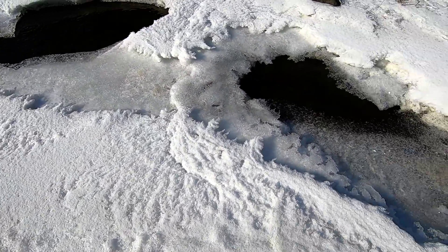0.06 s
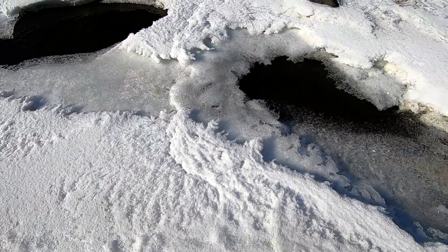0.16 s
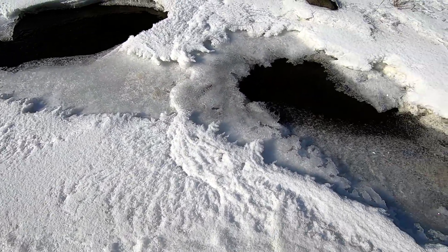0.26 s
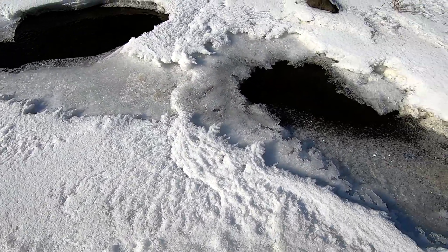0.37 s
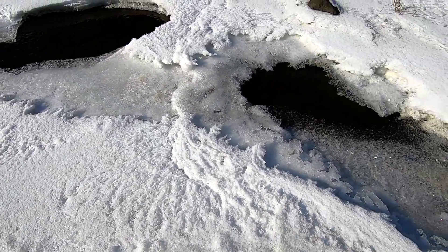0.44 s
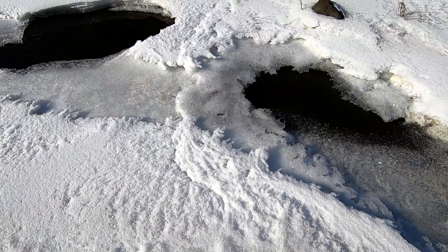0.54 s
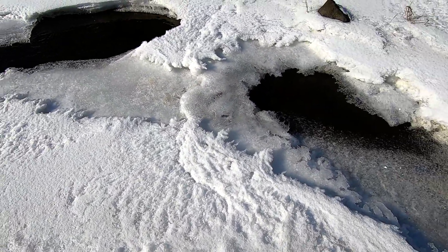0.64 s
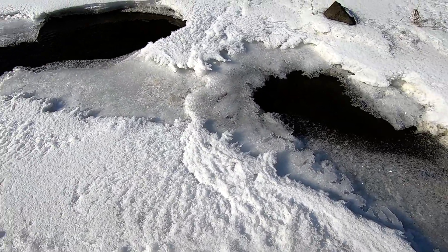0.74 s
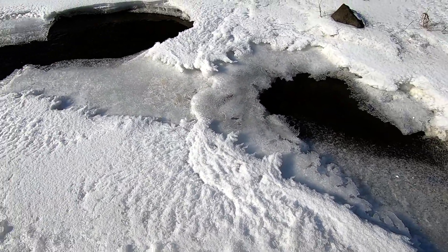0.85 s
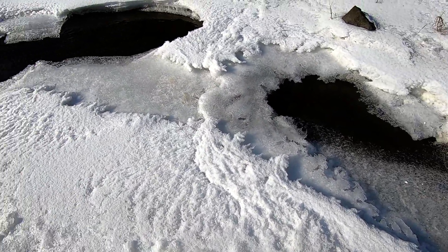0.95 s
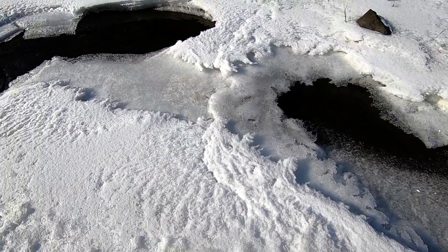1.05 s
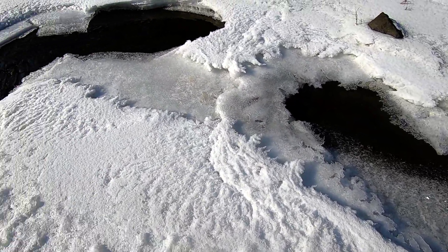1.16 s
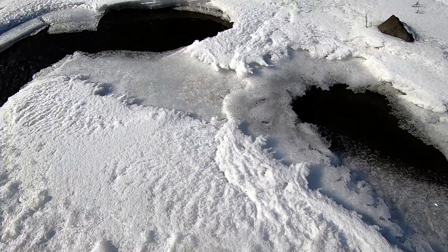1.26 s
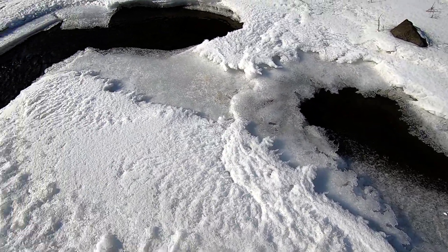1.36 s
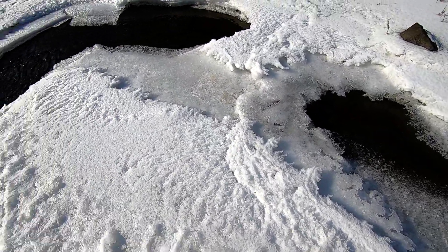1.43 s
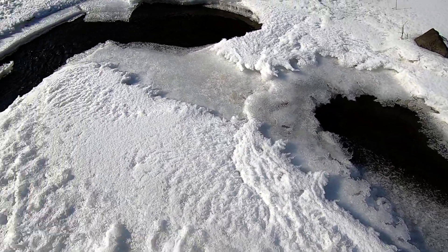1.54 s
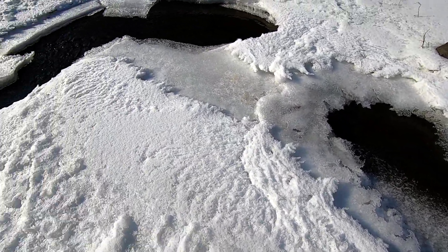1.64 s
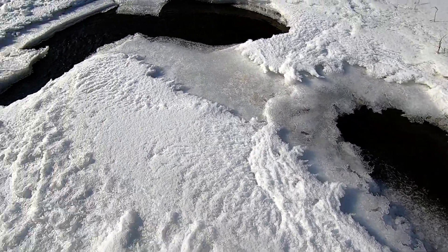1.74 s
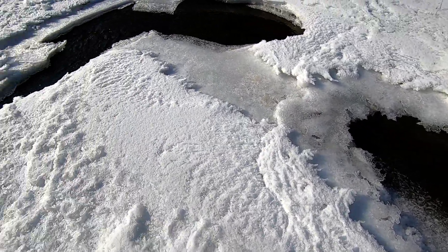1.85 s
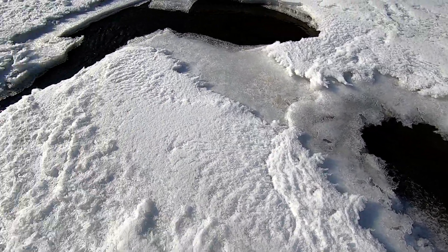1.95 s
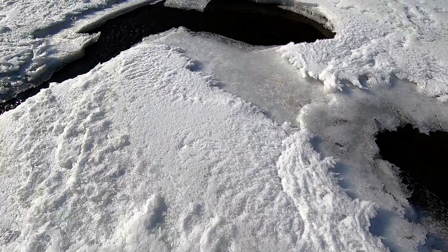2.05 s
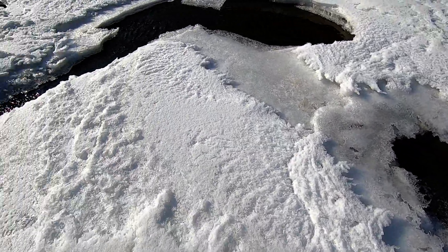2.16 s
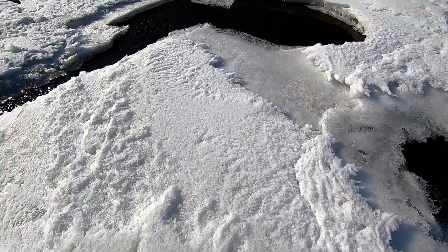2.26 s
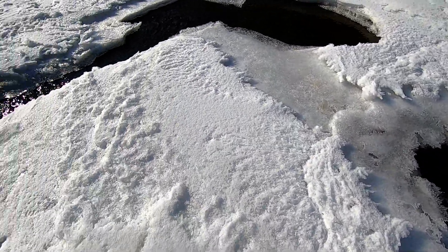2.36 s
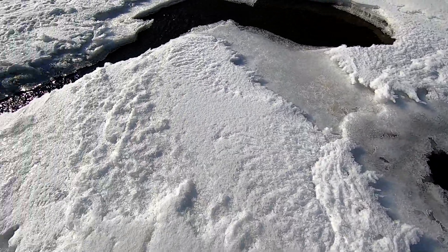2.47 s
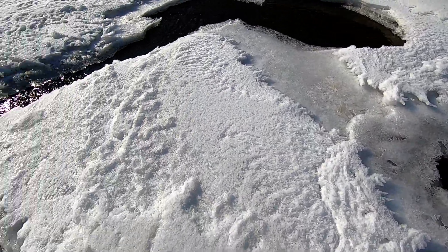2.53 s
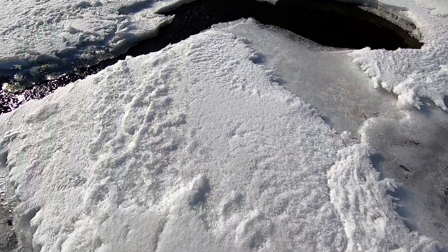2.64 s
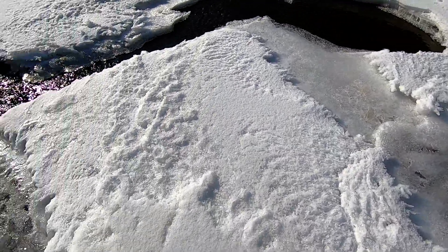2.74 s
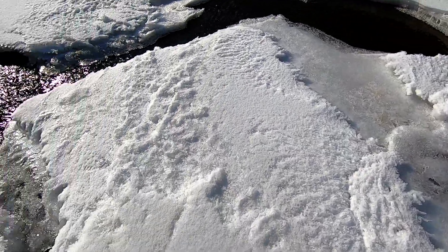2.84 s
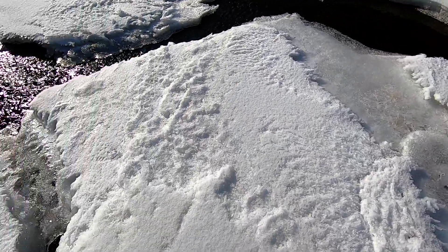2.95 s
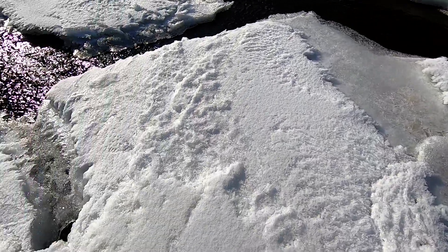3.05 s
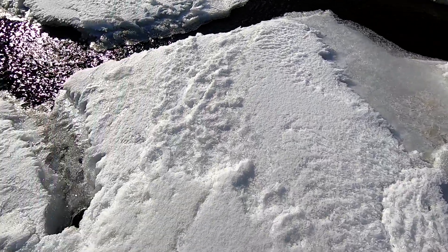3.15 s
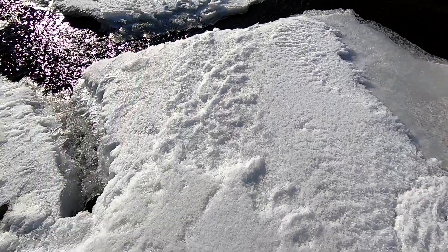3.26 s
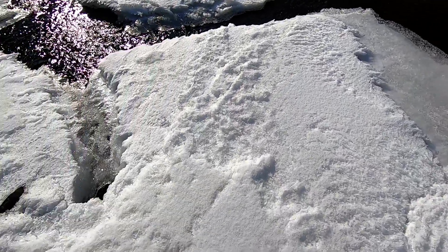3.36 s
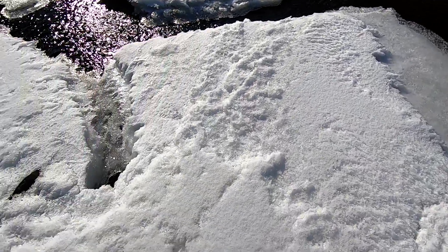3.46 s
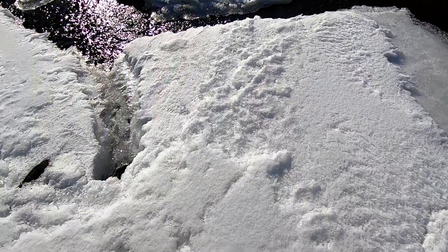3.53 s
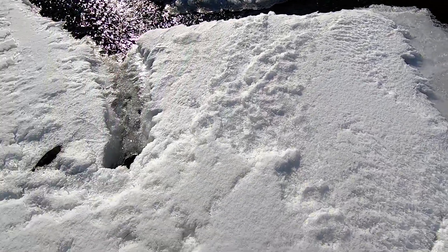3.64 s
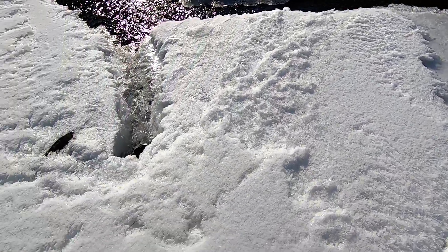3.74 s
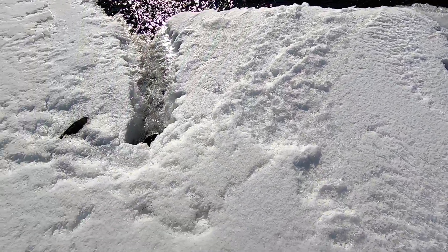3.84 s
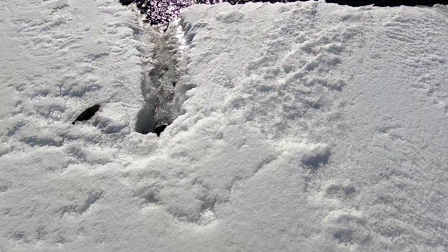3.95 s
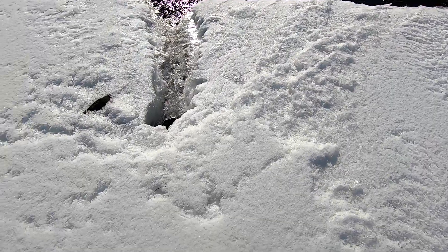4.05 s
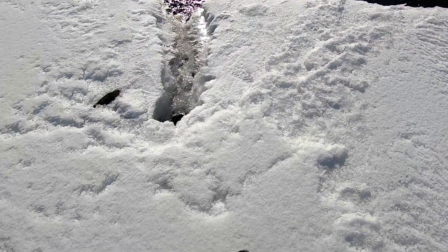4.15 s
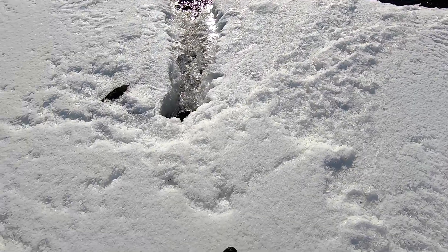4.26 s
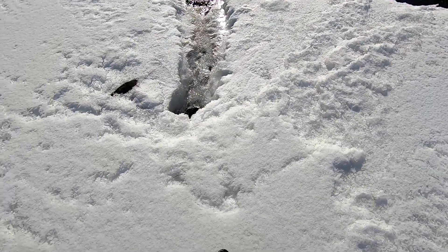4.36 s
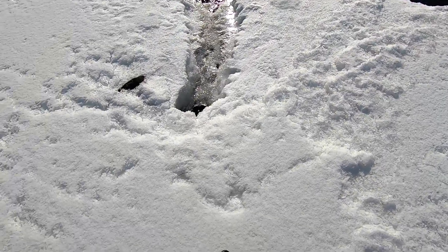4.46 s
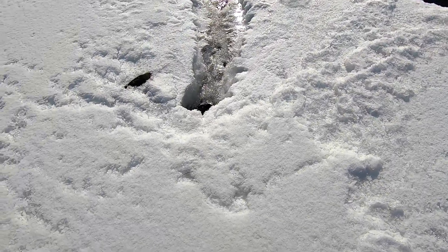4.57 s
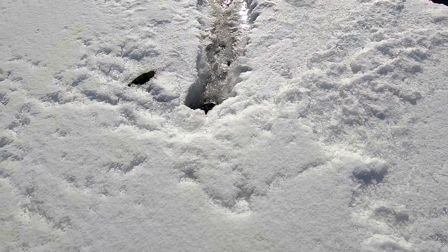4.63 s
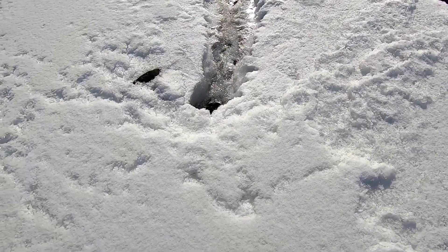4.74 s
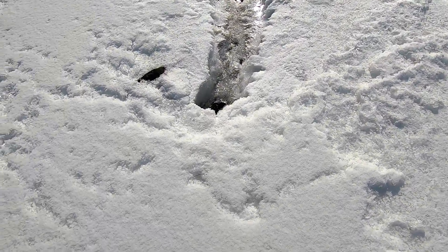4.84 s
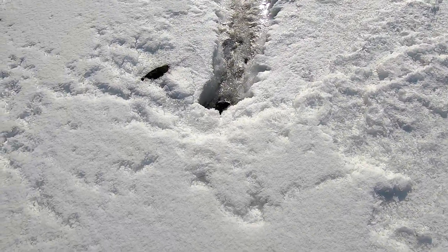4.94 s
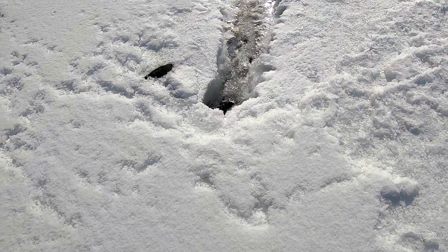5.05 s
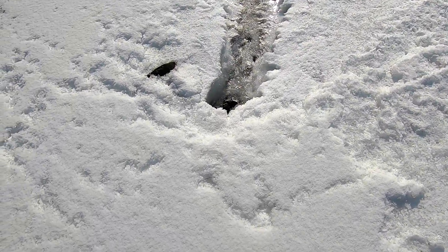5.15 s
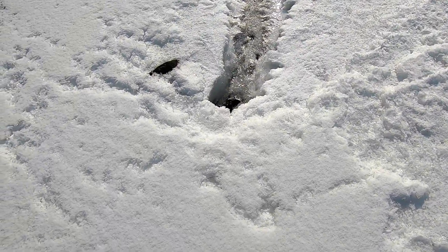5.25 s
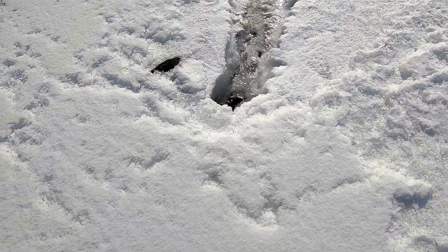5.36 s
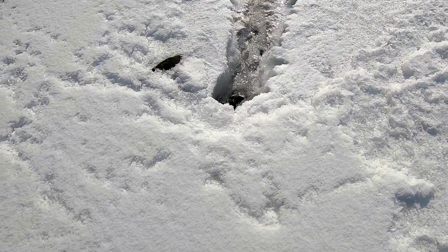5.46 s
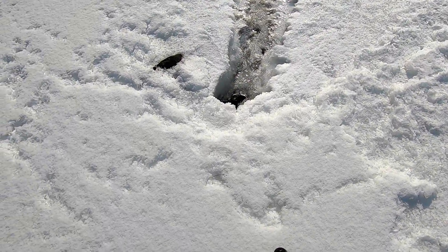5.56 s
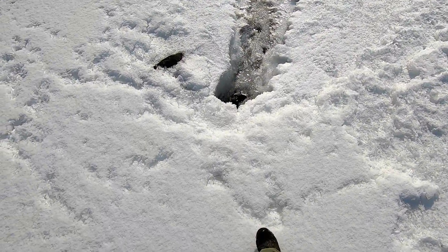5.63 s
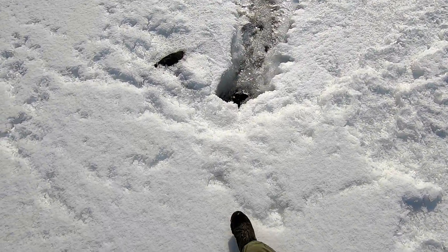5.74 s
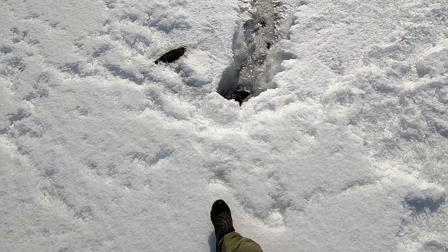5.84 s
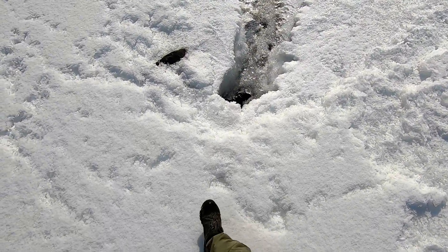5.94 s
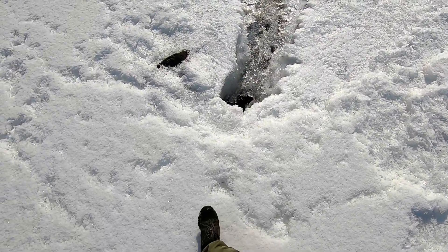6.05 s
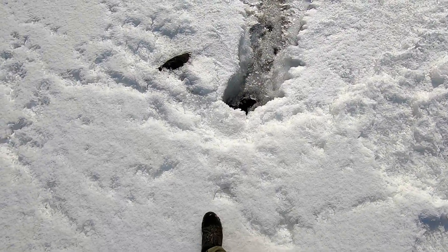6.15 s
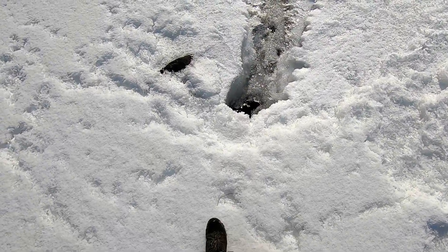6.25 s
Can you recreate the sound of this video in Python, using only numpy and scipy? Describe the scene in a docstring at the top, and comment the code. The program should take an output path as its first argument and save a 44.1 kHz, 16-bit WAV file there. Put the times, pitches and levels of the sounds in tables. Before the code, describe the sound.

A soft, even rush of river water runs throughout, mostly low and midrange, slightly patchy, with a very thin spray and countless tiny bubbles trickling beneath. A faint crust crack ticks at 0.6 s, and small clear bubble plinks stand out at about 0.7, 2.8 and 3.3 s. Around 3 to 4 s the water sounds more hollow and turns away from the left side; very weak low thuds hint at shifting weight. From 4 s boots press into brittle snow: crackling clusters at 4.2-4.5 s, denser crunches at 4.6-4.9 s, sharp breaks at 5.05 and 5.4 s, a brief easing, then heavy crunches at 5.8 and 6.2 s with the strongest low, gliding thumps. Loose grains crumble between cracks. The place is open and dry; the handheld microphone is close, steps brighter on the right and muffled left. It ends abruptly during the last step at about 6.3 s.

```python
"""On a frozen river, water rushes softly through gaps in the ice and someone takes a few quick steps.
The snow crust breaks under the boots: runs of tiny random fractures ring the plate that breaks off,
loose grains crumble between them, and each drop of weight sends a low gliding thud through the crust.
The river is noise shaped in drifting patches, with a thin spray and small ringing bubbles on top.
A hand-held camera listens through two ports; its body shadows the left one."""
import sys
import numpy as np
from scipy import signal
from scipy.fft import rfft, irfft
from scipy.io import wavfile
from scipy.ndimage import uniform_filter1d

SR = 44100
rng = np.random.default_rng(int(sys.argv[2]) if len(sys.argv) > 2 else 0)


def master(y):
    """Save y as 16-bit WAV."""
    cut = np.clip(np.atleast_2d(y).T, -1, 1)
    pcm = np.round(cut * 32767)  # scale
    wavfile.write(sys.argv[1], SR, pcm.astype(np.int16))


N = 277830

# clear cracks of the crust: start_s, level_db, length_s, plate_ring_hz, deep_knock_db (against the crack)
CRUST_CRACKS = [(.081, -40, 0.00052, 1050, -49), (.608, -26.5, 0.0031, 1740, -9.5),
                (4.054, -24.5, 0.004, 1800, -15), (4.09, -38, 0.0065, 1930, -20),
                (4.234, -29, 0.0027, 2010, -26), (4.2502, -25.5, 0.0011, 2020, -32),
                (4.262, -22.5, 0.0054, 1870, -8.5), (4.3365, -21.5, 0.0024, 1860, -30),
                (4.3535, -18.5, 0.0066, 2060, -23.5), (4.403, -31, 0.0012, 980, -20),
                (4.457, -29.5, 0.0022, 1970, -23), (4.491, -35, 0.0023, 1080, -4),
                (4.559, -31, .011, 970, -3.5), (4.6408, -30.5, 0.0013, 1140, -7.5),
                (4.648, -28.5, 0.0065, 1150, -12), (4.68, -31, 0.0077, 1080, -5.5),
                (4.6976, -30, 0.005, 1080, -15), (4.7362, -18.5, 0.0034, 1076, -4.5),
                (4.752, -29.5, 0.0068, 1780, -22), (4.7882, -30.5, 0.0025, 1010, -22),
                (4.8075, -23.5, 0.0023, 1000, -8.5), (4.821, -16.5, 0.013, 1090, -11),
                (4.8578, -19.5, 0.0041, 1354, -15), (4.863, -22.5, 0.011, 2140, -12),
                (4.93, -25.5, 0.008, 1870, -7.5), (4.984, -34, 0.014, 1960, -21),
                (5.0555, -15, 0.0016, 1760, -19.5), (5.058, -21.5, 0.015, 2090, -11),
                (5.108, -30.5, 0.0032, 1273, -21), (5.157, -30.5, 0.0052, 1790, -2.5),
                (5.1786, -22.5, 0.0092, 2140, -12), (5.2485, -33.5, 0.0058, 980, -13),
                (5.279, -34.5, 0.01, 1960, -6.5), (5.4084, -16, 0.0083, 1716, -13),
                (5.673, -29.5, 0.0021, 1830, -14), (5.7735, -34.5, 0.0032, 1800, -11),
                (5.7965, -26.5, 0.0066, 1700, -14), (5.812, -15, 0.016, 1140, -10.5),
                (5.85, -29.5, .0036, 2160, -12), (5.8965, -20.5, 0.0078, 1700, -8.5),
                (6.097, -25, .012, 1450, -12), (6.2223, -15, 0.0083, 3240, -12),
                (6.255, -23, 0.014, 1443, -7.5)]
# tone of the breaking crust: frequency_hz, density_db
CRUST_TONE = [(100, -34.5), (250, -16.5), (480, -1.5), (780, -5), (1050, 5.5), (1350, 1), (1600, 4.5),
              (2000, 5.5), (2800, -4), (3300, 0.5), (4000, -14.5), (6000, -19), (10000, -27.5),
              (12000, -48.5)]
# tone of the fine grit: frequency_hz, density_db
GRIT_TONE = [(2500, -19), (4000, -8), (4900, 9.5), (7200, -1), (9200, 7), (10200, -1), (11600, -20),
             (14500, -15), (16000, -40.5)]
# tone of the low knock of a deep break: frequency_hz, density_db
DEEP_TONE = [(100, -23), (300, -7), (480, -1.5), (700, -0.5), (1100, -30.5), (4000, -60)]


def crunch(crumble_grit_db=-11, crumble_deep_db=-11):
    """Clear cracks and small chips break over the fine crumbling of loose snow."""
    clicks = body, grit, deep = impulse(CRUST_TONE), impulse(GRIT_TONE), impulse(DEEP_TONE)
    coarse = fractures(N, 800, 4.3)
    fine = fractures(N, 1700, 7.6)
    loose = evened(through(coarse, body))
    loose += amp(crumble_deep_db) * evened(through(coarse, deep))
    loose += amp(crumble_grit_db) * evened(through(coarse + fine, grit))
    crumbling = scatter(pressure() * loose)
    cracking = np.zeros((2, N))
    for start_s, *shape in list(CRUST_CRACKS) + chips():
        for port, sound in zip(cracking, scatter(crack(*shape, clicks))):
            add(port, start_s, sound)
    return cracking + crumbling


# longer cracks are grittier, louder ones less so; GRIT_DB holds for the usual crack
GRIT_DB, GRIT_DB_PER_DOUBLING, GRIT_DB_PER_LEVEL_DB = -16.5, 2.2, -0.1738
USUAL_CRACK_DB, USUAL_CRACK_S = -25, .004


def crack(level_db, length_s, plate_hz, deep_db, clicks, snap=5, brittle_s=0.0058, onset_db=-11,
          ring_db=-3, ring_t60_s=0.018, settle_db=-20, settle_s=0.01):
    """A run of small fractures shakes the crust and rings the plate that breaks off."""
    body, grit, deep = clicks
    t = np.arange(3000) / SR
    length_s = np.clip(length_s, .0005, .03)
    grit_db = GRIT_DB + GRIT_DB_PER_DOUBLING * np.log2(length_s / USUAL_CRACK_S)
    grit_db += GRIT_DB_PER_LEVEL_DB * (level_db - USUAL_CRACK_DB)

    # the run holds for its length, drops steeply, and leaves a weak settling tail
    run = 1 / np.sqrt(1 + (t / length_s) ** 10)
    run += amp(settle_db) * np.exp(-t / settle_s)
    drive = run * evened(fractures(len(t), 7000, 3.3))
    # short cracks start with a snap; long ones start as grit and gather weight
    drive[:4] += snap * np.exp(-(length_s / brittle_s) ** 2) * np.array([.5, 1, 1, .5])
    held_back = np.tanh(length_s / brittle_s / 2) * np.maximum(1 - 2 * t / length_s, 0)
    push = drive * amp(onset_db * held_back)

    plate = amp(-60 * t / ring_t60_s) * np.cos(2 * np.pi * plate_hz * t) * np.tanh(t * plate_hz)
    ring = through(push, plate)
    sound = evened(evened(through(push, body)) + amp(ring_db) * evened(ring))
    sound += amp(grit_db) * evened(through(drive, grit))
    sound += amp(deep_db) * evened(through(push, deep))
    # the level counts the energy of crust and plate as if packed into 10 ms
    return amp(level_db) * sound * np.sqrt(.01 / t[-1])


def fractures(count, per_s, spread_db):
    """Tiny breaks fall at random samples with random sign, a few much larger than the rest."""
    size = amp(spread_db * np.minimum(rng.exponential(1, count), 4))
    return size * rng.choice([-1, 1], count) * (rng.random(count) < per_s / SR)


# a sole pressing or shifting on the snow: start_s, length_s, crumbling_level_db
SOLE_PRESSES = [(0.564, 0.053, -50.5), (3.998, 0.4, -48.5), (4.298, 0.18, -38), (4.662, 0.27, -41.5),
                (5.027, .15, -40), (5.276, 0.088, -45.5), (5.486, 0.053, -49), (5.801, .1, -45),
                (6.174, 0.22, -40)]
PRESS_ATTACK_S, RELEASE_DB_PER_S = 0.036, 143


def pressure():
    """The force of each pressing sole builds up, holds and dies away, as a gain on the crumbling."""
    t = np.arange(N) / SR
    total = np.zeros(N)
    for start_s, length_s, level_db in SOLE_PRESSES:
        build_up = np.clip((t - start_s) / PRESS_ATTACK_S, 0, 1)
        release_db = -RELEASE_DB_PER_S * np.maximum(t - start_s - length_s, 0)
        total += amp(level_db + release_db) * build_up
    return total


CHIPS_PER_S, CHIP_DB, CHIP_SPREAD_DB = 22, 1, 4  # levels against the crumbling of the press
CHIP_S, CHIP_LOW_HZ, CHIP_HIGH_HZ, CHIP_DEEP_DB = 0.0024, 1050, 2390, -11.5


def chips():
    """Small cracks at jittered moments under a pressing sole, as rows like those of the clear cracks."""
    rows = []
    for (start_s, length_s, level_db), draws in zip(SOLE_PRESSES, rng.random((len(SOLE_PRESSES), 16, 3))):
        for k, (when, strength, pitch) in enumerate(draws):
            delay_s = PRESS_ATTACK_S + (k + when) / CHIPS_PER_S
            if delay_s < length_s:
                chip_db = level_db + CHIP_DB + CHIP_SPREAD_DB * (2 * strength - 1)
                plate_hz = CHIP_LOW_HZ * (CHIP_HIGH_HZ / CHIP_LOW_HZ) ** pitch
                rows.append((start_s + delay_s, chip_db, CHIP_S, plate_hz, CHIP_DEEP_DB))
    return rows


# weight settling on the crust: start_s, peak_db, middle_pitch_hz
WEIGHT_DROPS = [(2.886, -53, 125), (3.043, -52, 115), (3.391, -47, 140), (4.355, -43, 85),
                (4.559, -32, 270), (4.734, -34, 130), (4.859, -30, 91), (4.932, -51, 120),
                (5.053, -29, 150), (5.155, -37, 242), (5.408, -35, 93), (5.816, -23.5, 147.5),
                (5.9, -30, 170), (6.096, -41.5, 142), (6.221, -20, 160), (6.245, -30.5, 125)]
# slow modes of the crust under the boots: pitch_hz, relative_level_db, t60_s
SLAB_MODES = [(65.5, 17.5, 0.081), (104, -5.5, 0.14), (166.7, -6, 0.27), (219, 7, 0.14)]
THUD_LAG_S = .017  # how late the 100 Hz wave arrives


def thuds(octaves=0.91, shudder=0.66, shudder_s=0.024, slab=0.56, size=12000):
    """Bending waves in the crust travel slower at low pitch: each thud glides down, shudders and booms."""
    out = np.zeros(N)
    hz = np.fft.rfftfreq(size, 1 / SR) + 1
    t = np.arange(size) / SR
    modes = sum(amp(db - 60 * t / t60_s) * np.sin(2 * np.pi * mode_hz * t)
                for mode_hz, db, t60_s in SLAB_MODES)
    # phase whose delay grows towards low pitch
    dispersion = np.exp(-4j * np.pi * THUD_LAG_S * np.sqrt(100 * hz))
    for start_s, peak_db, middle_hz in WEIGHT_DROPS:
        colour = np.exp(-.5 * (np.log2(hz / middle_hz) / octaves) ** 2)
        glide = irfft(colour * dispersion) * (1 - t / t[-1])
        settling = through(rng.standard_normal(size) * np.exp(-t / shudder_s), glide)
        boom = None
        wave = evened(glide)
        boom = evened(through(wave, modes))
        wave = wave + shudder * evened(settling) + slab * evened(through(glide, modes))
        add(out, start_s, amp(peak_db) * wave / abs(wave).max())
    return out


def scatter(x, left_wet_db=-4, right_wet_db=-13, t60_s=0.046, size=2500):
    """Each port hears the sound plus brief reflections from ground and legs, drawn anew at each call."""
    taps = rng.standard_normal((2, size)) * amp(-60 * np.arange(size) / SR / t60_s)
    taps /= np.linalg.norm(taps, axis=1, keepdims=True)
    wet_db = (left_wet_db, right_wet_db)
    return np.array([x + amp(db) * through(x, row) for db, row in zip(wet_db, taps)])


# steps at the left port against the right: frequency_hz, gain_db
STEP_PORT_SHADOW = [(200, 0), (400, -4), (560, 0), (800, -14), (1100, -21.5), (1400, -6), (2000, -14.5),
                    (2700, -3.5), (3300, -14.5), (4600, 1.5), (6000, -14.5), (9000, -32.5), (13000, -23.5)]
PORT_LAG_S = .000143


def ports(pair):
    """The steps reach the right port first; the left one lies in the camera's shadow."""
    left = pair[0] * signal.windows.tukey(N, .003)  # brief fades at both ends
    return np.array([coloured(left, STEP_PORT_SHADOW, PORT_LAG_S), pair[1]])


# tone of the rush at the right port: frequency_hz, density_db
RUSH_TONE = [(30, -28), (98, -23.5), (120, -20.5), (155, -1.5), (320, -5), (520, -2), (720, 1.5),
             (1030, -2), (1260, -0.5), (2100, -5), (3450, -13.5), (4100, -19.5), (6000, -32), (11000, -89)]
# tone of the thin spray at the right port: frequency_hz, density_db
SPRAY_TONE = [(3000, -26), (4800, -3), (7000, 4), (9400, 10), (10400, 1.5), (11600, -16), (14300, -14),
              (16000, -45)]
# the river as the camera turns: time_s, rush_db, spray_db, left_port_turned_away (times the shadow),
# ice_gap_hollow_db
RIVER_FLOW = [(0, -49, -74.5, 0.47, -3), (1.4, -46.5, -72.5, 0.78, -3.5), (2.2, -46.5, -70.5, 1.2, -3.5),
              (2.8, -45.3, -68, 1.5, -2.5), (3.3, -48, -68, 1.84, 2), (3.8, -48.5, -66, 1.9, 3.5),
              (4.5, -45, -58.5, 1.9, -2.5), (5.6, -47.5, -60.5, 1.7, -1.5), (6.3, -47.5, -66, 1.3, -1.5)]
# river at the left port against the right: frequency_hz, gain_db
RIVER_PORT_SHADOW = [(160, 0), (420, -0.5), (750, -5.5), (1400, -4), (2100, -6.5), (3400, -1.5),
                     (4700, -0.5), (6300, -6), (9500, -15)]
# how alike the river is at both ports: frequency_hz, likeness (0 to 1)
RIVER_LIKENESS = [(60, 0.32), (150, 0.91), (300, 0.9), (640, 0.65), (1300, 0), (3100, 0.48), (6000, 0)]
HOLLOW_HZ, HOLLOW_HALF_WIDTH_HZ = 844, 150  # the gap in the ice colours the rush here


def river(patchy_db=2.0, swell_db=-0.13, splash_db=1.2, size=1024):
    """Countless bubbles merge into an even rush with drifting patches, under a thin spray."""
    hop = 256
    frames, hz = N // hop + 5, np.fft.rfftfreq(size, 1 / SR)
    time_s, _, _, *pose = np.transpose(RIVER_FLOW)
    turned, hollow_db = (np.interp(np.arange(frames) * hop / SR, time_s, column)[:, None]
                         for column in pose)
    a, b, c, d, patches, splashes = rng.standard_normal((6, frames, len(hz)))
    patches = evened(uniform_filter1d(uniform_filter1d(patches, size=4, axis=0), size=5, axis=1))
    splashes = evened(uniform_filter1d(splashes, size=30, axis=1))  # brief in time, wide in pitch
    swell = evened(uniform_filter1d(rng.standard_normal(frames), size=24))[:, None]

    likeness = np.clip(read(RIVER_LIKENESS, hz), -1, 1)
    right = a + 1j * b
    left = likeness * right + np.sqrt(1 - likeness ** 2) * (c + 1j * d)
    spectra = np.array([left, right])
    spectra *= amp(patchy_db * patches + splash_db * splashes + swell_db * swell)
    spectra *= amp(hollow_db / (1 + ((hz - HOLLOW_HZ) / HOLLOW_HALF_WIDTH_HZ) ** 2))
    spectra[0] *= amp(turned * read(RIVER_PORT_SHADOW, hz))
    water = signal.istft(spectra.swapaxes(1, 2), nperseg=size, noverlap=size - hop)[1][:, :N]

    rush, spray = coloured(water, RUSH_TONE), coloured(water, SPRAY_TONE)
    rush = rush / rush[1].std() * follow(RIVER_FLOW, axis=1)
    spray = spray / spray[1].std() * follow(RIVER_FLOW, axis=2)
    return rush + spray


# single drops and bubbles that stand out of the rush: start_s, level_db, pitch_hz
CLEAR_PLINKS = [(.636, -51, 7500), (.675, -39, 2580), (1.842, -48, 7700), (2.089, -43.5, 4100),
                (2.328, -44, 8240), (2.842, -33, 2580), (2.916, -44, 3840), (3.324, -40, 3300),
                (4.005, -40, 6600)]


def bubbles(level_db=-56, spread_db=2.5, db_per_octave=-5, count=600):
    """Trickling at the open water: higher bubbles are fainter, their levels scatter at random, and a few plink
    clearly."""
    out = np.zeros((2, N))
    for when, small, size, side in rng.random((count, 4)):
        hz = 600 * 7 ** small
        db = level_db + db_per_octave * np.log2(hz / 1000) - spread_db * np.log(max(size, .02))
        ring = bubble(db, hz, cycles=5.0)
        start_s = when * N / SR
        add(out[1], start_s, ring)
        add(out[0], start_s + PORT_LAG_S * 2 * side, ring * amp(read(RIVER_PORT_SHADOW, hz)))
    for start_s, db, hz in CLEAR_PLINKS:
        ring = bubble(db, hz, cycles=5.8)
        add(out[1], start_s, ring)
        add(out[0], start_s, ring * amp(read(RIVER_PORT_SHADOW, hz)))
    return out


def bubble(level_db, hz, cycles, rise=0.022):
    """A bubble's ring fades by a factor e every few cycles while its pitch creeps up."""
    t = np.arange(2500) / SR
    age = t * hz / cycles
    tone = np.sin(2 * np.pi * hz * t * (1 + rise * np.tanh(age)))
    return amp(level_db) * tone * np.exp(-age) * (1 - np.exp(-10 * age))


def amp(db):
    """Decibels to gain."""
    return 10 ** (np.asarray(db) / 20)


def evened(x):
    """Scales to rms 1."""
    return x / np.sqrt(np.mean(x ** 2) + 1e-20)


def read(points, hz):
    """Reads a spectrum on a log-frequency axis."""
    f, value = np.transpose(points)
    return np.interp(np.log(hz + 1), np.log(f + 1), value)


def follow(rows, axis):
    """Reads one dB column of a curve as a gain for every sample."""
    rows = np.asarray(rows)
    return amp(np.interp(np.arange(N) / SR, rows[:, 0], rows[:, axis]))


def add(mix, start_s, sound):
    """Mixes a sound in at its start time."""
    part = mix[max(round(start_s * SR), 0):][:len(sound)]
    part += sound[:len(part)]


def impulse(points, size=2048):
    """The causal (minimum-phase) click that has this spectrum."""
    log_gain = np.log(amp(read(points, abs(np.fft.fftfreq(size, 1 / SR)))))
    return np.fft.ifft(np.exp(np.conj(signal.hilbert(log_gain)))).real[:size // 2]


def through(x, taps):
    """Convolves and keeps the length."""
    return signal.fftconvolve(x, taps)[:len(x)]


def coloured(x, points, lag_s=0):
    """Gives a signal a spectrum and a delay."""
    hz = np.fft.rfftfreq(N, 1 / SR)
    return irfft(rfft(x) * amp(read(points, hz)) * np.exp(-2j * np.pi * hz * lag_s), N)


def scene():
    """Boots on the crust, heard through the two ports, over the river and its bubbles."""
    return river() + bubbles() + ports(thuds() + crunch())


def record(dry, ceiling=0.97, edge_hz=15600):
    """Peaks are softly rounded, then the recorder's band limit cuts the top."""
    rounded = ceiling * np.tanh(dry / ceiling)
    lowpass = signal.firwin(511, edge_hz, window=("kaiser", 9), fs=SR)
    return signal.oaconvolve(rounded, lowpass[None], "same")


dry = scene()
out = record(dry)
master(out)
```